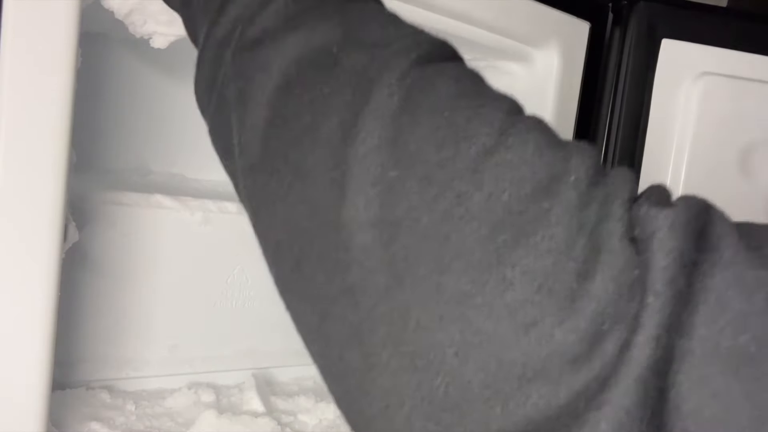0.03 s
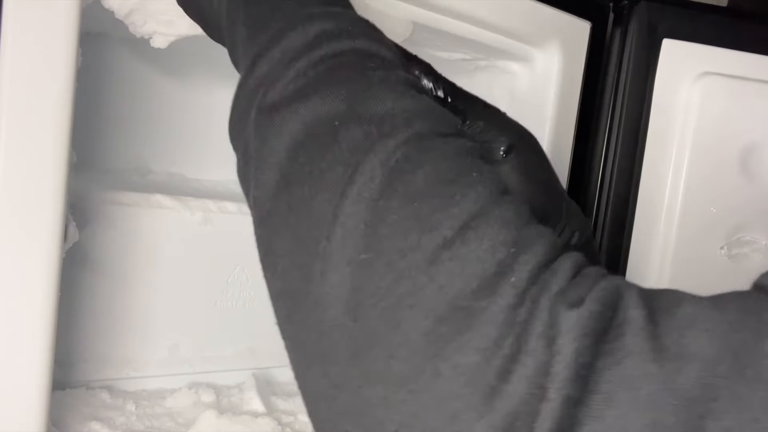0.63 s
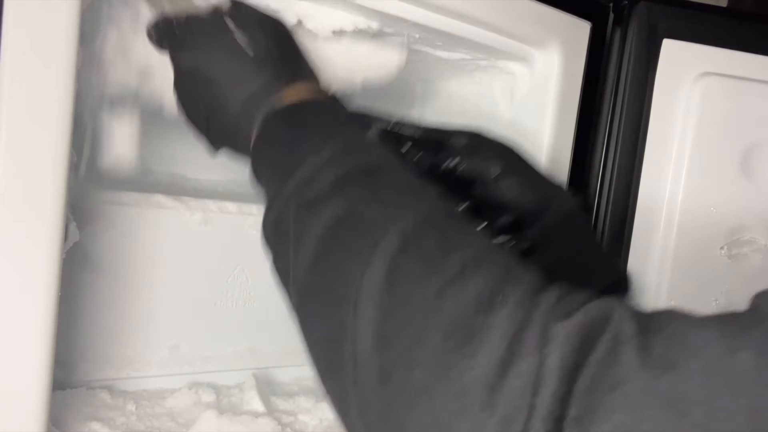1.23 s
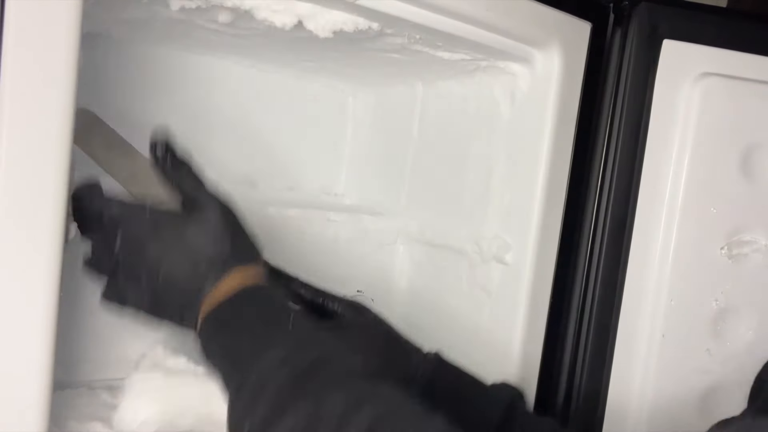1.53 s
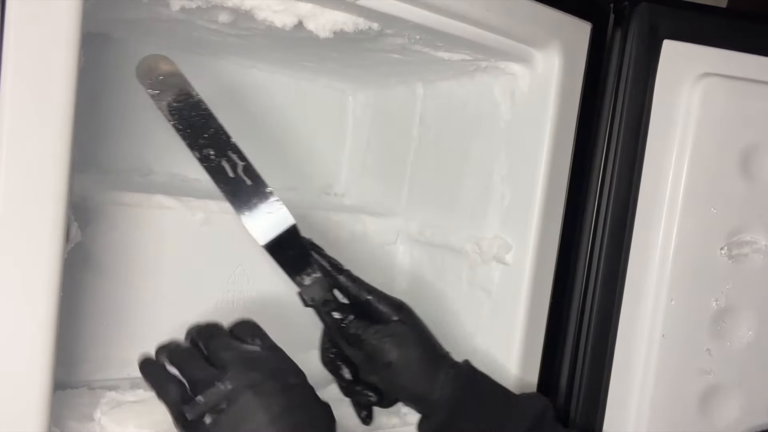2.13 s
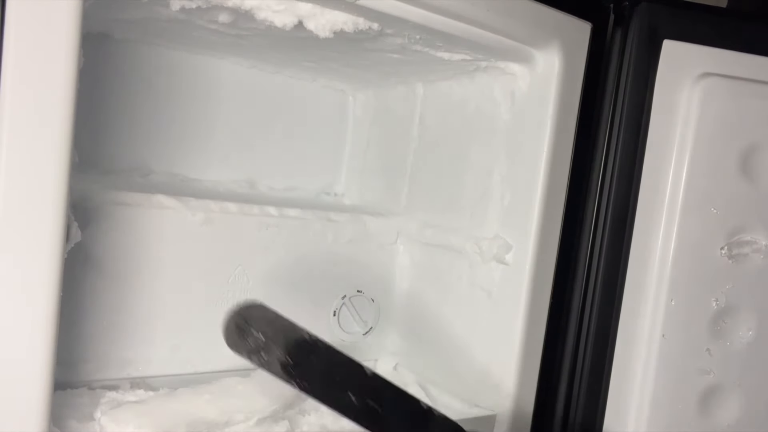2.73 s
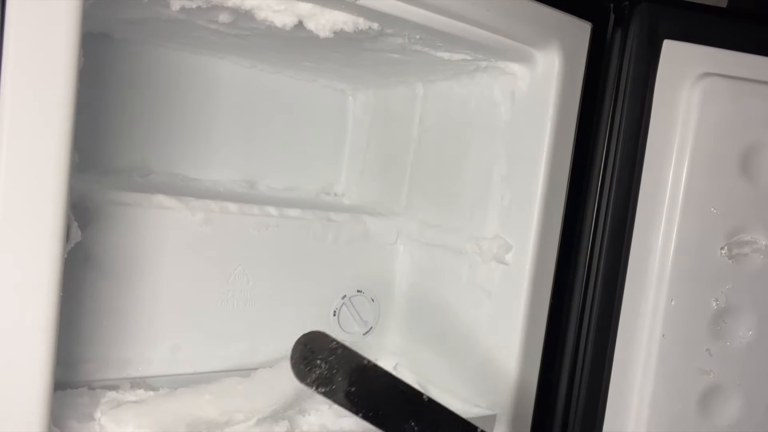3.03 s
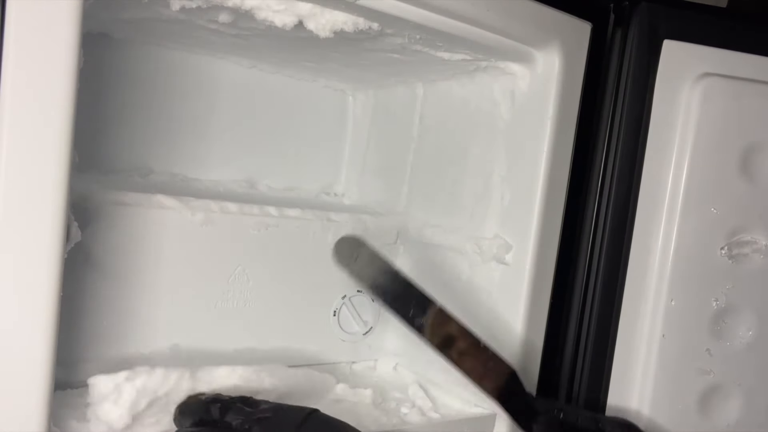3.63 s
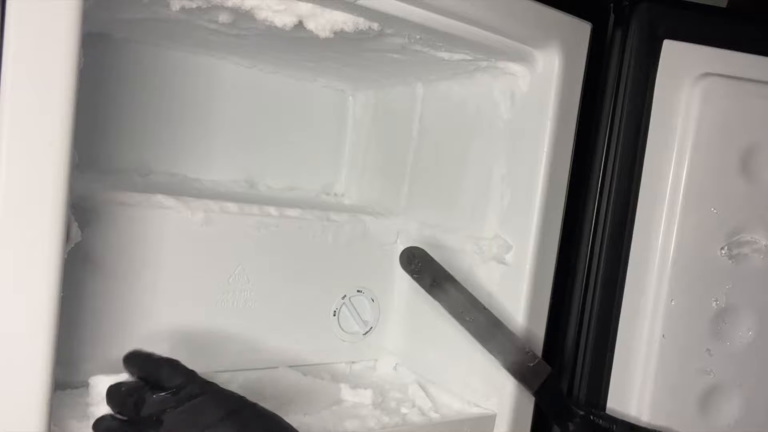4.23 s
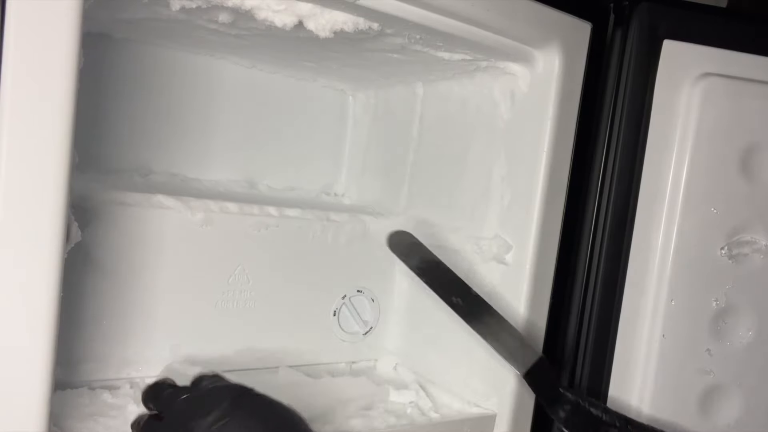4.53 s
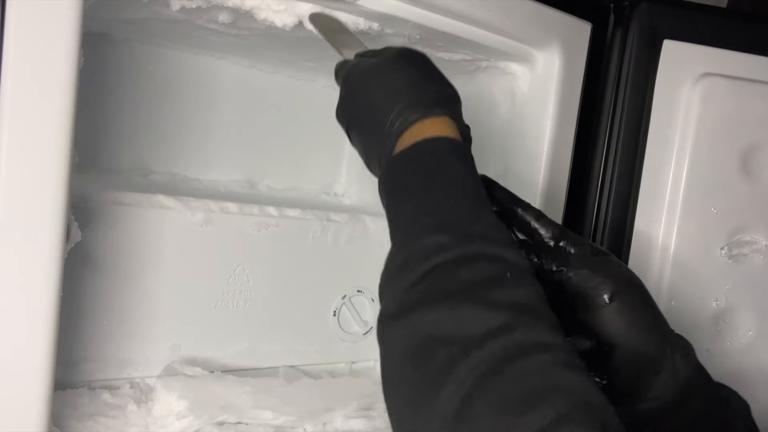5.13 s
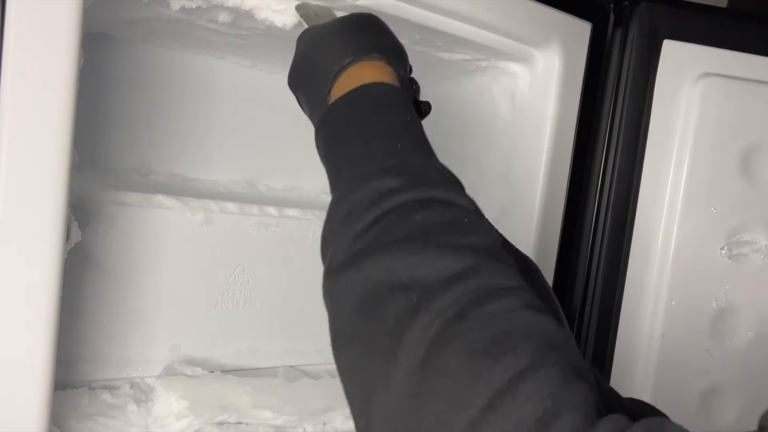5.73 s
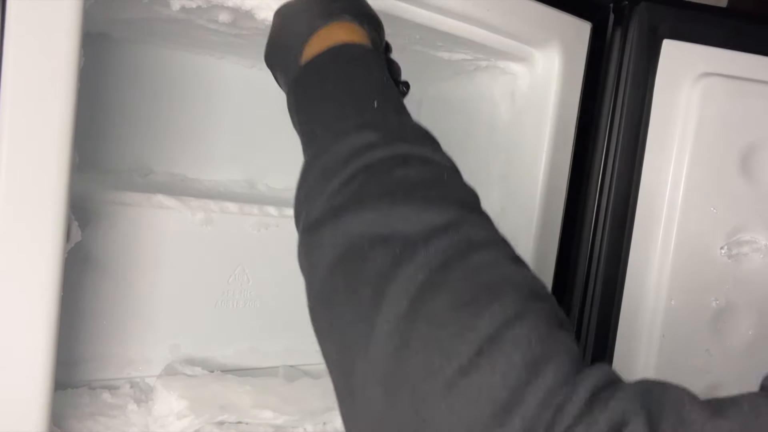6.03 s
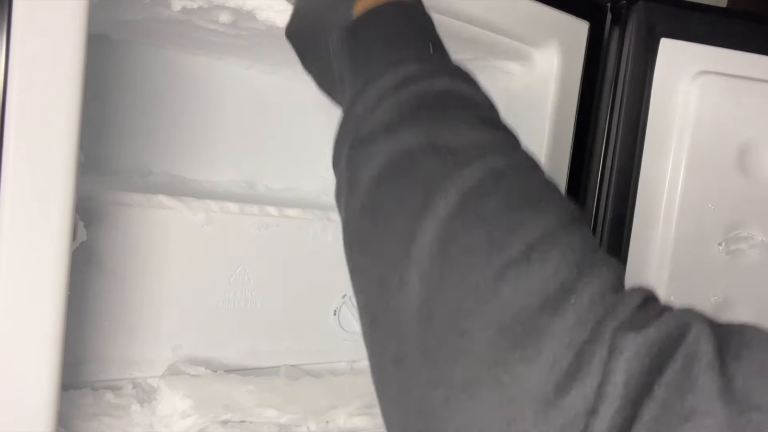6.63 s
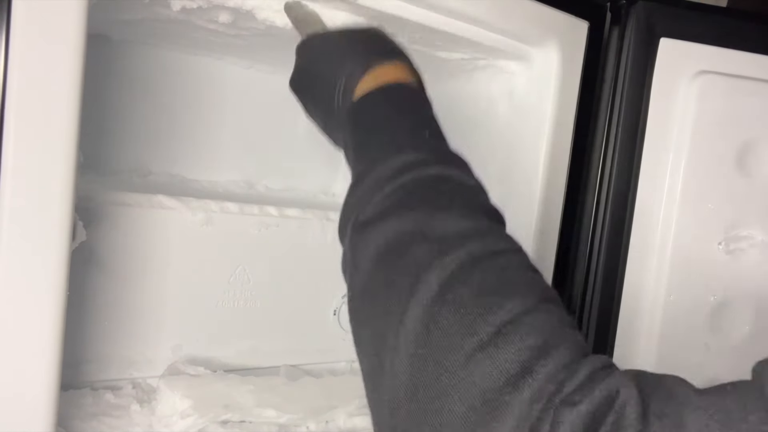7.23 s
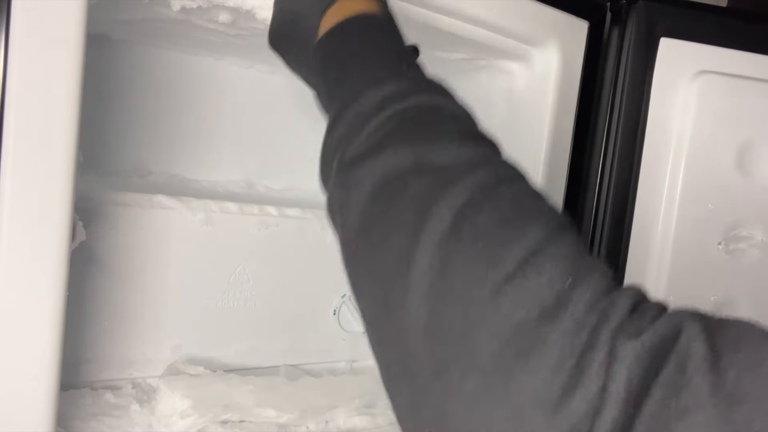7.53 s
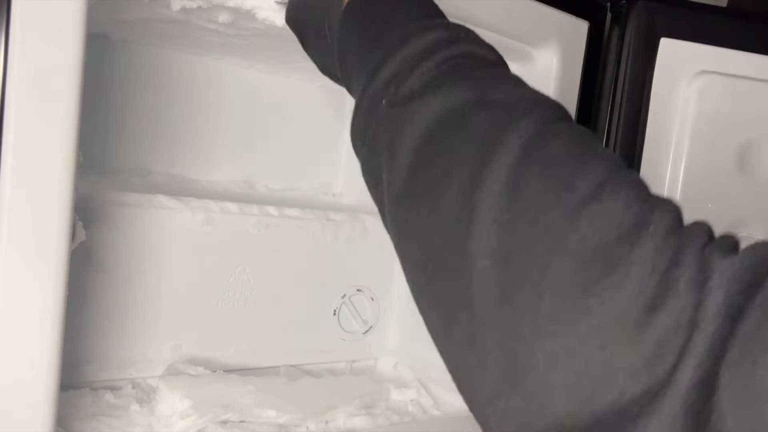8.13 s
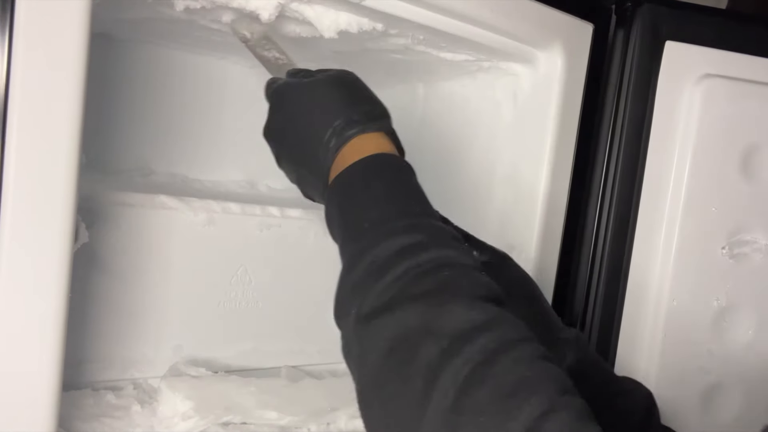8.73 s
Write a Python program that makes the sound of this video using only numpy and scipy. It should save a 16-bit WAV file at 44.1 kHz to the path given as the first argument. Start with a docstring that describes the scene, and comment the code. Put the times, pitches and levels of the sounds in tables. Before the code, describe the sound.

Close scraping of frost in a small freezer, two loud crashes of falling ice, soft glove rustles, then more chipping and knocking.

```python
"""A metal blade scrapes frost off the roof of a small freezer, close by. Just after 1 s, two slabs
crash onto the plastic liner. A glove gathers the loose ice. From 5.3 s the blade digs in again,
chips, twangs, and squeaks once near 7.7 s. Throughout, blows run through the liner, highs first,
ring in the compartment and rock the cabinet; a compressor hums; the loudest blows overload."""
import sys
import numpy as np
from scipy import signal
from scipy.fft import rfft, irfft
from scipy.io import wavfile
from scipy.ndimage import uniform_filter1d

SR = 44100
rng = np.random.default_rng(int(sys.argv[2]) if len(sys.argv) > 2 else 0)


def inscribe(sig):
    """Save sig as 16-bit PCM at rate SR to the path in sys.argv[1].

    A 1-D sig is mono; a 2-D sig holds one channel per row.
    Samples are clipped to [-1, 1] before scaling.
    """
    pcm = np.round(np.clip(np.atleast_2d(sig).T, -1, 1) * 32767)
    wavfile.write(sys.argv[1], SR, pcm.astype(np.int16))


N = 387638

# blade and ice striking the liner: start_s, level_db, hardness_db, crumble_s
BLOWS = [(0.074, -26.5, -3, 0.048), (0.29, -24, 1, 0.016), (1.145, -3, 0, 0.045), (1.364, -4, 1, 0.065),
         (1.449, -14.5, -1.5, 0.023), (1.518, -12, 0.5, 0.024), (1.979, -32.5, -5, 0.027),
         (2.065, -45.5, 1, 0.0075), (2.312, -44.5, 0, 0.014), (2.448, -41.5, -1.5, 0.013),
         (2.64, -50, -8, 0.012), (2.806, -49, -2.5, 0.014), (2.842, -38, -3.5, 0.02),
         (3.137, -38.5, -1.5, 0.0066), (3.296, -39, -3.5, 0.017), (3.784, -31, -0.5, 0.016),
         (4.076, -32, -2.5, 0.031), (4.289, -29, 1, 0.0042), (5.229, -36.5, -6, 0.038),
         (5.305, -34.5, 5.5, 0.036), (5.405, -24, 4, 0.016), (5.433, -28, 2, 0.014),
         (5.498, -21, 0.5, 0.019), (5.954, -39, -14, 0.0092), (6.274, -31, -0.5, 0.025),
         (6.385, -22, 0, 0.023), (6.418, -24.5, -1, 0.026), (6.457, -22.5, -0.5, 0.01),
         (6.474, -31, 9, 0.0055), (6.497, -20.5, 4, 0.046), (6.704, -12, 0.5, 0.0023),
         (6.731, -18, 4, 0.025), (6.762, -12, 0.5, 0.0015), (6.8, -10.5, 1, 0.0026),
         (6.922, -8, 0.5, 0.007), (6.96, -13, -0.5, 0.028), (7.006, -9, -0.5, 0.0048),
         (7.062, -5, 1, 0.027), (7.112, -15.5, -2.5, 0.027), (7.296, -12.5, -1.5, 0.044),
         (7.506, -9.5, -2, 0.021), (7.994, -17, 5, 0.011), (8.055, -20.5, -1.5, 0.018),
         (8.101, -17.5, -2, 0.035), (8.174, -12, -1.5, 0.047)]
# blade pushed through frost: start_s, length_s, swell_db, end_grind_db, hardness_db, end_crunch_db
BLADE_STROKES = [(0.069, 0.3, -1.5, -42, 2, -34), (0.52, 0.084, -2, -42, 4.5, -33.5),
                 (0.72, 0.25, 9.5, -51, 9, -35.5), (1.022, 0.11, 5, -49, 8, -30.5),
                 (1.157, 0.1, -10, -31, 2.5, -25), (1.312, 0.023, 0.5, -38.5, 6, -35),
                 (5.302, 0.025, 26, -22.5, -1, -30), (5.393, 0.15, -7.5, -35, -5, -40.5),
                 (5.613, 0.041, 6, -25.5, 5, -18), (6.002, 0.15, -5, -39.5, 1.5, -39),
                 (6.282, 0.097, 8.5, -43, 5, -39.5), (6.357, 0.16, 24, -21.5, 4, -19),
                 (6.533, 0.1, -4, -37.5, 0, -35.5), (6.659, 0.17, -5.5, -42.5, 6, -31.5),
                 (6.969, 0.1, 6, -28.5, 3.5, -16.5), (7.075, 0.046, 6, -19.5, 2, -20),
                 (7.162, 0.125, 7.5, -31.5, 8, -19), (7.288, 0.08, -2.5, -14, 0.5, -20),
                 (7.406, 0.089, 6, -24.5, 5, -26), (7.496, 0.083, 1, -12.5, 0.5, -18),
                 (7.614, 0.2, 3, -28.5, 4, -26.5), (7.852, 0.054, 3.5, -22.5, 3.5, -25),
                 (7.999, 0.08, 2.5, -19, 1.5, -19), (8.074, 0.16, 5, -14, -0.5, -17.5)]
# octave bands of the liner: centre_hz
BANDS_HZ = [140, 280, 580, 1080, 2050]


def scrape(spots, ice, clump_db=2.5, clump_hz=130, travel_hz=3.3):
    """Frost fractures in clumps, denser under force, hissing and shaking the liner from spot to spot."""
    t = np.arange(N) / SR
    coarse_t = t[::64]
    envelopes, grind_db, hardness_db, crunch_db = map(np.array, zip(*contacts(coarse_t)))

    def level(gains):
        return np.interp(t, coarse_t, np.sqrt(gains ** 2 @ envelopes ** 2))

    clumps = amp(clump_db * wander(N, clump_hz))
    force = level(amp(grind_db + np.maximum(hardness_db, 0) + 35))  # 1 at -35 dB
    rate_per_s = np.clip(1100 * force ** 0.7, 300, 20000)
    fractures = unit_rms(grains(N, rate_per_s, spread_db=5.0) * clumps / np.sqrt(rate_per_s))
    place = np.floor(t * travel_hz * len(spots) + rng.random(N)) % len(spots)
    grind = 0
    for k in range(len(BANDS_HZ)):
        shake = sum(convolve(fractures * (place == i), unit_rms(spot[k])) for i, spot in enumerate(spots))
        grind += level(band_gain(k, grind_db, hardness_db)) * unit_rms(shake)
    grit = fractures + clumps * rng.standard_normal(N)
    crunch = level(amp(crunch_db)) * unit_rms(glitter(convolve(grit, ice), patch_db=3.5))
    by_blade = np.arange(len(grind_db)) < len(BLADE_STROKES)
    singing = level(amp(crunch_db) * by_blade) * blade_singing(grit)
    return stalls() * (grind + crunch + singing)


def contacts(t, bite_s=0.0088, release_db_per_s=300, rub_hardness_db=-1.5):
    """Blade strokes, then glove rubs; yields envelope, grind_db, hardness_db, crunch_db."""
    # glove and loose frost sliding on the liner: peak_s, rise_s, fall_s, grind_db, crunch_db
    rubs = [(0.34, 0.42, 0.17, -35, -28), (0.81, 0.15, 0.28, -35, -28), (1.141, 0.018, 0.03, -20.5, -17),
            (1.561, 0.47, 0.21, -22.5, -22.5), (1.879, 0.2, 0.13, -37, -35),
            (2.13, 0.079, 0.11, -32, -40.5), (2.624, 0.055, 0.057, -49.5, -42),
            (2.78, 0.07, 0.14, -52, -46.5), (3.11, 0.09, 0.17, -51.5, -47.5), (3.309, 0.1, 0.055, -45, -44),
            (3.559, 0.11, 0.22, -25.5, -32.5), (3.887, 0.23, 0.15, -32.5, -36),
            (4.2, 0.66, 0.1, -40.5, -46), (4.416, 0.11, 0.12, -20, -28), (4.494, 0.075, 0.082, -19.5, -26),
            (4.698, 0.061, 0.18, -60, -53), (5.983, 0.032, 0.019, -16.5, -26.5),
            (6.207, 0.3, 0.021, -34.5, -63), (6.86, 0.032, 0.25, -41, -36),
            (8.387, 0.11, 0.14, -24.5, -27.5)]
    for start_s, length_s, swell_db, grind_db, hardness_db, crunch_db in BLADE_STROKES:
        bite = np.clip((t - start_s) / bite_s, 0, 1)
        push_db = swell_db * (np.clip((t - start_s) / length_s, 0, 1) - 1)
        release_db = release_db_per_s * np.clip(t - start_s - length_s, 0, 1)
        yield bite * amp(push_db - release_db), grind_db, hardness_db, crunch_db
    for peak_s, rise_s, fall_s, grind_db, crunch_db in rubs:
        yield swell(t, peak_s, rise_s, fall_s), grind_db, rub_hardness_db, crunch_db


def stalls(depth_db=8, build_s=0.0098):
    """Scrape gain: the blade sticks as force builds before each blow."""
    dip_db = np.zeros(N)
    ramp = np.linspace(0, 1, round(build_s * SR))
    for start_s, *_ in BLOWS:
        add(dip_db, start_s - build_s, -depth_db * ramp)
    return amp(dip_db)


def blade_singing(grit, size=1024):
    """Grinding rings the blade's high resonances."""
    # high blade modes: pitch_hz, width_hz, level_db
    modes = [(5670, 150, -25), (7350, 150, -18.5), (8440, 250, -20), (13300, 500, -15)]
    t = np.arange(size) / SR
    return sum(amp(db) * unit_rms(convolve(grit, np.exp(-np.pi * width_hz * t) * sine(hz * t)))
               for hz, width_hz, db in modes)


def knocks(spots, ice, blow_s=0.00094, size=16384):
    """A sharp blow, then a dying shower of crumbs; harder blows splinter more."""
    out, t = np.zeros(N), np.arange(size) / SR
    for start_s, db, hardness_db, crumble_s in BLOWS:
        spot = spots[rng.integers(len(spots))]
        crumbs = grains(size, per_s=3000, spread_db=5.5) * np.exp(-1.9 * t / crumble_s)
        blow = rng.standard_normal(size) * np.exp(-t / blow_s)
        force = unit_rms(crumbs) + 0.69 * unit_rms(blow)
        body = sum(band_gain(k, db, hardness_db) * unit_rms(convolve(force, band))
                   for k, band in enumerate(spot))
        splinters = amp(db - 5 + 0.435 * hardness_db) * unit_rms(glitter(convolve(force, ice)))
        crash = (body + splinters) * np.sqrt(crumble_s * SR / size)
        add(out, start_s, crash + amp(db + 2.5) * clack(hardness_db, size))
    return out


def clack(hardness_db, size, octaves_per_db=0.44, edge_ratio=1.36, ring_s=0.01):
    """The struck patch of liner rings briefly, higher under a harder blow."""
    t = np.arange(size) / SR
    centre_hz = np.clip(769 * 2 ** (octaves_per_db * hardness_db), 200, 2000)
    ring = bandpass(rng.standard_normal(size), centre_hz / edge_ratio, centre_hz * edge_ratio)
    return unit_rms(ring * np.exp(-(t / ring_s) ** 2)) * np.sqrt(ring_s * SR / size)


def snaps(spots, ice, tick_db=-8, tilt_db_per_band=2, decay_s=0.0015, size=4096):
    """A crystal splits within milliseconds and ticks against the liner."""
    # loudest crystals: start_s, crack_peak_db
    crystals = [(0.207, -9.5), (0.265, 0), (0.2921, -2.5), (0.3371, -3), (0.3568, -2), (0.531, -9),
                (0.6379, -21.5), (0.8229, -11), (1.3859, 9.5), (1.627, -3.5), (1.8477, -7), (2.3102, -28.5),
                (2.745, -29), (2.788, -30.5), (2.841, -28), (3.0595, -21), (3.1807, -31), (3.594, -18),
                (3.6377, -17), (5.24, -25), (5.379, -21), (5.436, -13), (5.4695, -11), (5.483, -21),
                (5.603, -5), (5.6174, -15), (5.626, -5), (5.6552, 4), (5.6744, -1.5), (5.898, -31),
                (5.907, -31), (6.1043, -10.5), (6.3857, -14), (6.4168, -3.5), (6.4559, -3), (6.473, 1),
                (6.4981, -6), (6.531, -3), (6.6677, 3.5), (6.961, 3), (7.041, -1.5), (7.136, -2),
                (7.149, -2), (7.1674, -3), (7.187, -14), (7.994, 0), (8.028, -1), (8.1426, -6),
                (8.5804, -22.5), (8.606, -27)]
    out, t = np.zeros(N), np.arange(size) / SR
    for start_s, db in crystals:
        spot = spots[rng.integers(len(spots))]
        split = rng.standard_normal(size) * np.exp(-t / decay_s)
        crack = unit_rms(glitter(convolve(split, ice)))
        tick = sum(amp(tick_db + (k - 4) * tilt_db_per_band) * unit_rms(convolve(split, band))
                   for k, band in enumerate(spot))
        add(out, start_s, amp(db) * (crack + tick) / abs(crack).max())
    return out


def bumps(rise_s=0.0086, glide=0.46, glide_s=0.0082, size=6000):
    """A padded push bends the liner: a few low cycles, falling in pitch."""
    # soft pushes: start_s, level_db, end_pitch_hz
    pushes = [(0.077, -16.5, 177), (0.105, -14.5, 171), (1.177, -12.5, 100), (1.397, -6, 129.4),
              (1.837, -25.5, 184), (2.076, -29, 136), (6.339, -11, 156), (7.581, -11.5, 132.5),
              (8.214, -15, 78.6), (8.251, -10.5, 175), (8.318, -12.5, 165)]
    out, t = np.zeros(N), np.arange(size) / SR
    for start_s, db, hz in pushes:
        cycles = np.cumsum(hz * (1 + glide * np.exp(-t / glide_s))) / SR
        envelope = t / rise_s * np.exp(1 - t / rise_s)
        add(out, start_s, amp(db) * np.sqrt(2) * envelope * sine(cycles))
    return out


def twangs(slip_s=0.045, size=20000):
    """The blade slips off the frost and rings free."""
    # blade slips: start_s, level_db
    slips = [(5.326, -23.5), (5.499, -26), (5.63, -17.5), (6.391, -27.5), (7.07, -14)]
    # free blade modes: pitch_hz, level_db, t60_s
    modes = [(345.6, 2, 0.13), (400, 3.5, 0.11), (545, -9, 0.22), (1273, 1.5, 0.097), (1560, -1.5, 0.05),
             (1950, -5.5, 0.117), (2150, -18, 0.1), (2550, -18, 0.06)]
    out, t = np.zeros(N), np.arange(size) / SR
    for start_s, db in slips:
        slip = rng.standard_normal(size) * t * np.exp(-2 * t / slip_s)
        ring = sum(amp(mode_db) * unit_rms(convolve(slip, amp(-60 * t / t60_s) * sine(hz * t)))
                   for hz, mode_db, t60_s in modes)
        peak_rms = np.sqrt(np.max(uniform_filter1d(ring ** 2, size=1000)))
        add(out, start_s, amp(db) * ring / peak_rms)
    return out


def squeak(jitter=0.017, rasp=0.35, flutter_db=4.0, second_db=-4, slope_db_per_octave=-9, edge_s=0.0053):
    """The blade sticks and slips on bare plastic: an unsteady tone roughened by grit."""
    # squeak contour: time_s, pitch_hz, level_db
    contour = [(7.685, 691, -23), (7.715, 975, -24), (7.733, 980, -17.5), (7.747, 982, -15.5),
               (7.777, 1286, -22), (7.791, 1292, -22.5), (7.809, 1073, -24.5), (7.819, 1060, -21),
               (7.831, 1063, -20), (7.842, 980, -35)]
    t = np.arange(contour[0][0], contour[-1][0], 1 / SR)
    hz, db = curves(contour, t)
    phase = 2 * np.pi * np.cumsum(hz * (1 + jitter * wander(len(t), rate_hz=506))) / SR

    def partial(k):
        return np.sin(k * phase) + rasp * wander(len(t), rate_hz=900) * np.cos(k * phase)

    tone = partial(1)
    tone += sum(amp(second_db + np.log2(k / 2) * slope_db_per_octave) * partial(k) for k in range(2, 9))
    grip = np.minimum(np.minimum(t - t[0], t[-1] - t) / edge_s, 1)
    gain = amp(db + 2 + flutter_db * wander(len(t), rate_hz=202))
    out = np.zeros(N)
    add(out, t[0], np.sqrt(2) * tone * grip * gain)
    return out


def ice_response():
    """Impulse response of breaking frost, thinning below 1.5 kHz."""
    # crunch spectrum: frequency_hz, density_db
    spectrum = [(1500, -5.5), (2600, 2.5), (3800, 0), (5000, -0.5), (7400, 0), (10500, -4.5), (15500, -5.5)]
    return minimum_phase(lambda hz: amp(at_hz(spectrum, hz)) * np.minimum(hz / 1500, 1), size=512)


def glitter(x, patch_db=1.0):
    """Crystals of changing size favour ever-changing pitches."""
    frames = signal.stft(x, SR, nperseg=256)[2]
    patches = uniform_filter1d(rng.standard_normal(frames.shape), size=4, axis=0)
    patches = uniform_filter1d(patches, size=14, axis=1)
    return signal.istft(frames * amp(patch_db * unit_rms(patches)), SR, nperseg=256)[1][:len(x)]


def brighten(x, shelf_hz=10100):
    """The level of the top treble drifts slowly through the scene, highest from 5.3 s to 6.1 s."""
    # treble shelf: time_s, gain_db
    shelf = [(0.5, -2), (3, -5.5), (4.7, -7), (5.3, 4.5), (6.1, 2.5), (7.1, -1), (7.7, -1), (8.7, -5)]
    db, = curves(shelf, np.arange(N) / SR)
    top = signal.sosfiltfilt(signal.butter(2, shelf_hz, "high", fs=SR, output="sos"), x)
    return x + (amp(db) - 1) * top


def liner_spot(bend=0.11174, scatter=0.63, scatter_s=0.0067, spread_db=2, detune_per_hz=1.5e-5, size=8192):
    """One spot's response by band: bending waves arrive highs first, bounce off edges, ring the modes."""
    # liner and compartment modes: pitch_hz, width_hz, level_db
    modes = [(133, 8.6, 8.5), (179.9, 10, 10), (211.5, 20, 4.5), (272.6, 29, 9.5), (330, 20, 12.5),
             (518.5, 37.6, 10), (597, 58, 8.5), (797, 8.7, 2.5), (990, 157, 5), (1199, 26, 4.5),
             (1483, 35, 0.5), (1990, 293, 10), (2390, 270, 7)]
    hz, t = np.fft.rfftfreq(size, 1 / SR), np.arange(size) / SR
    drives = rng.choice([-1, 1], len(modes)) * amp(spread_db * rng.standard_normal(len(modes)))
    shifts = detune_per_hz * rng.standard_normal(len(modes))  # frost load moves the high modes
    resonance = 1 + sum(1j * drive * amp(db) / (1 + 2j * (hz - mode_hz * (1 + shift * mode_hz)) / width_hz)
                        for drive, shift, (mode_hz, width_hz, db) in zip(drives, shifts, modes))
    chirp = np.exp(-2j * np.pi * bend * (2 * np.sqrt(hz) - hz / np.sqrt(2 * BANDS_HZ[-1])))
    bounces = rng.standard_normal(size) * t * np.exp(-t / scatter_s)
    echoes = 1 + scatter * rfft(bounces / np.linalg.norm(bounces))
    body = irfft(resonance * chirp * echoes)[:size * 3 // 4]
    return [bandpass(body, centre / np.sqrt(2), centre * np.sqrt(2), order=3) for centre in BANDS_HZ]


def band_gain(k, db, hardness_db):
    """Gain of liner band k: soft contact (hardness below 0) is dull, hard contact favours 1-2 kHz."""
    # liner balance, by band: level_db
    balance_db = [-3, -4, 2, 1, -3]
    # hard contact, by band: db_per_hardness_db
    hard_slopes = [-1.6, -2.16, -0.52, 0.9, 1.81]
    soft_db = (k - 2) * np.minimum(hardness_db, 0)
    hard_db = hard_slopes[k] * np.maximum(hardness_db, 0)
    return amp(db + balance_db[k] + soft_db + hard_db)


def compartment(x, wet_db=-10, treble_db=-6, onset_s=0.00045, size=26000):
    """Dense reflections off close walls, each band dying at its own rate."""
    # wall reverberation: frequency_hz, t60_s
    decays = [(100, 0.37), (260, 0.39), (700, 0.33), (1700, 0.46), (3000, 0.31), (4850, 0.21), (14000, .15)]
    hz, t, frames = signal.stft(rng.standard_normal(size), SR, nperseg=256)
    t60_s = at_hz(decays, hz)[:, None]
    colour = amp(at_hz([(2500, 0.015), (6000, treble_db)], hz))[:, None]
    unit_energy = np.sqrt(2 * np.log(1000) / (t60_s * SR))
    tail = signal.istft(frames * colour * amp(-60 * t / t60_s) * unit_energy, SR, nperseg=256)[1]
    tail *= 1 - np.exp(-np.arange(len(tail)) / SR / onset_s)
    return x + amp(wet_db) * convolve(x, tail)


def cabinet_sway(work, rock_hz=31, drift_hz=4.5, coupling_db=-10, heavy_hz=500, settle_s=0.035, flex_db=-8):
    """Heavy blows and the leaning arm rock the cabinet on its feet; its panels flex and rumble."""
    # arm leaning on the cabinet: peak_s, level_db
    shoves = [(0.18, -24), (0.8, -29), (5.48, -33), (6.05, -20.5), (6.4, -20), (7.581, -16), (7.85, -22.5),
              (8.35, -25)]
    t = np.arange(N) / SR
    pole = np.exp(-1 / (settle_s * SR))
    heavy = signal.sosfilt(signal.butter(2, heavy_hz, fs=SR, output="sos"), work)
    power = signal.lfilter([1 - pole], [1, -pole], (amp(coupling_db) * heavy) ** 2)
    power += sum((amp(db) * swell(t, peak_s, rise_s=0.25, fall_s=0.25)) ** 2 for peak_s, db in shoves)
    cycles = np.cumsum(rock_hz + drift_hz * wander(N, rate_hz=25)) / SR
    flex = bandpass(rng.standard_normal(N), low_hz=50, high_hz=100)
    return np.sqrt(power) * (np.sqrt(2) * sine(cycles) + amp(flex_db) * unit_rms(flex))


def hum_and_air(waver_db=3.0, air_db=-48):
    """Compressor hum in still room air."""
    # compressor tones: pitch_hz, level_db
    tones = [(48.4, -38), (96.9, -49.5), (145.3, -46.5), (193.6, -58), (592.2, -62.5), (786, -72.5)]
    # room air spectrum: frequency_hz, relative_density_db
    spectrum = [(60, -26.5), (130, -31), (405, -40), (591, -36.5), (734, -42.5), (2160, -44.5), (2690, -46),
                (16000, -65)]
    t = np.arange(N) / SR
    hum = sum(amp(db + waver_db * wander(N, rate_hz=42)) * sine(hz * t + rng.random()) for hz, db in tones)
    air = convolve(rng.standard_normal(N), minimum_phase(lambda hz: amp(at_hz(spectrum, hz))))
    return np.sqrt(2) * hum + amp(air_db) * unit_rms(air)


def amp(db):
    return 10 ** (np.asarray(db) / 20)


def sine(cycles):
    return np.sin(2 * np.pi * cycles)


def unit_rms(x):
    return x / np.sqrt(np.mean(x ** 2) + 1e-20)


def bandpass(x, low_hz, high_hz, order=2):
    return signal.sosfilt(signal.butter(order, [low_hz, high_hz], "band", fs=SR, output="sos"), x)


def convolve(x, response):
    return signal.oaconvolve(x, response)[:len(x)]


def add(mix, start_s, sound):
    part = mix[max(0, round(start_s * SR)):][:len(sound)]
    part += sound[:len(part)]


def at_hz(points, hz):
    """Interpolates over log frequency."""
    points_hz, values = np.transpose(points)
    return np.interp(np.log(hz + 1), np.log(points_hz + 1), values)


def curves(rows, t):
    """Interpolates each column over time."""
    time_s, *columns = np.transpose(rows)
    return [np.interp(t, time_s, column) for column in columns]


def minimum_phase(gain_at, size=4096):
    """Impulse response of the given gain, starting at once."""
    log_gain = np.log(np.maximum(gain_at(np.fft.rfftfreq(size, 1 / SR)), 1e-4))
    mirrored = np.concatenate([log_gain, log_gain[-2:0:-1]])
    return np.fft.ifft(np.exp(np.conj(signal.hilbert(mirrored)))).real


def wander(n, rate_hz):
    """Smooth random drift, rms 1."""
    steps = np.arange(n) * min(rate_hz, 1000) / SR
    knots = rng.standard_normal(n // 40 + 2)
    return unit_rms(np.interp(steps, np.arange(len(knots)), knots))


def grains(n, per_s, spread_db):
    """Random clicks of either sign, most small, a few large."""
    sizes = amp(spread_db * np.minimum(rng.exponential(1, n), 4))
    return sizes * rng.choice([-1, 1], n) * (rng.random(n) < per_s / SR)


def swell(t, peak_s, rise_s, fall_s, edge_db=-21):
    """Gain of a soft movement that builds and dies away."""
    distance = np.maximum((peak_s - t) / rise_s, (t - peak_s) / fall_s)
    return amp(edge_db * np.minimum(distance, 10))


def scene():
    """Blade, ice and glove inside the compartment, over the hum."""
    spots = [liner_spot() for _ in range(8)]
    ice = ice_response()
    work = scrape(spots[:3], ice) + knocks(spots, ice) + snaps(spots, ice) + bumps() + twangs() + squeak()
    return (compartment(brighten(work)) + cabinet_sway(work) + hum_and_air())[None]


def record(dry):
    """Peaks flatten at full scale; low-pass at 16.15 kHz."""
    clipped = dry / (1 + dry ** 8) ** (1 / 8)
    lowpass = signal.firwin(511, 16150, window=("kaiser", 8), fs=SR)
    return signal.oaconvolve(clipped, lowpass[None], "same")


dry = scene()
out = record(dry)
inscribe(out)
```